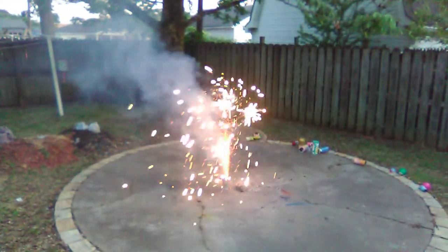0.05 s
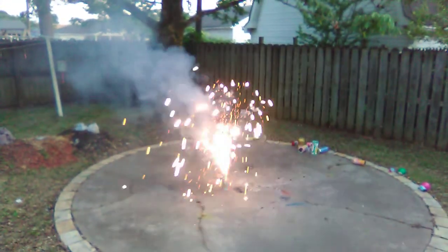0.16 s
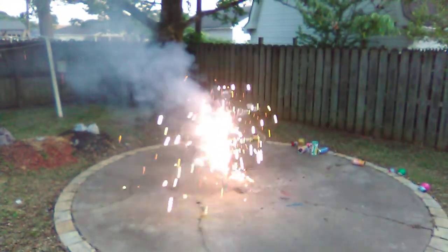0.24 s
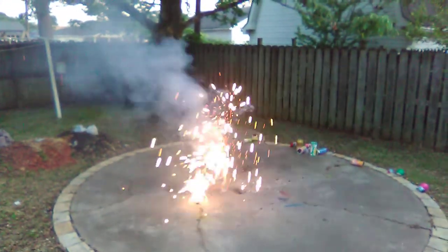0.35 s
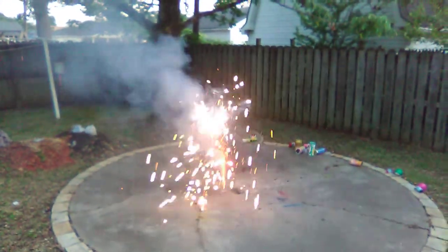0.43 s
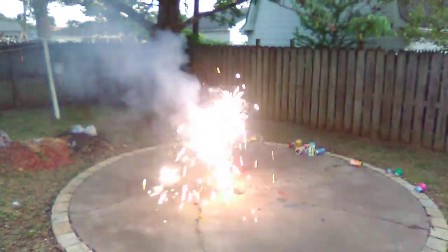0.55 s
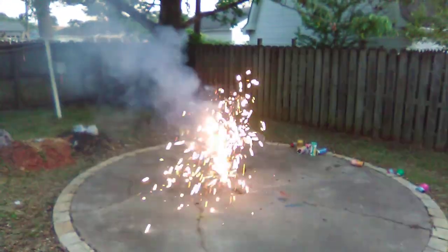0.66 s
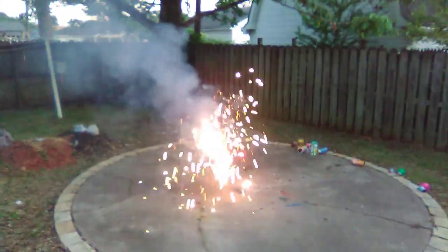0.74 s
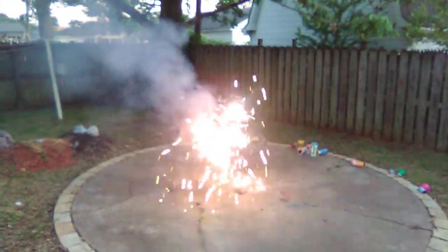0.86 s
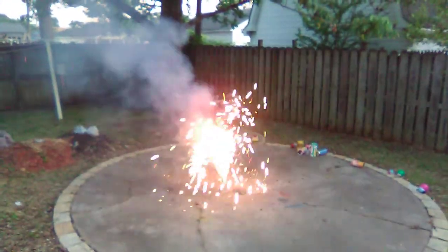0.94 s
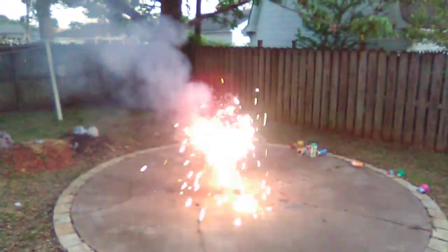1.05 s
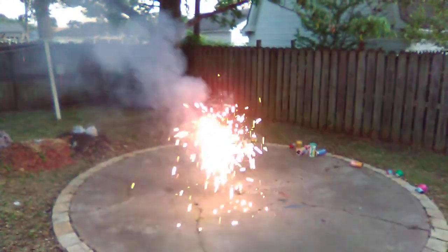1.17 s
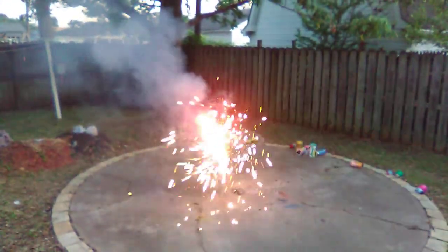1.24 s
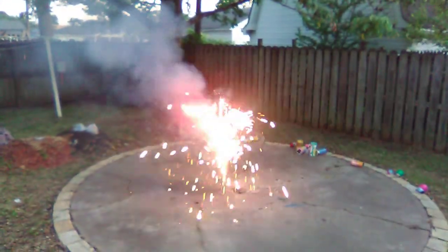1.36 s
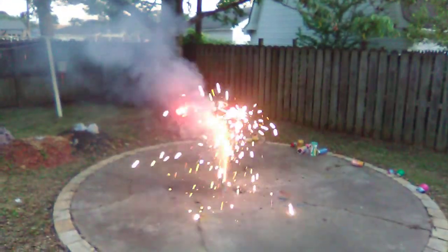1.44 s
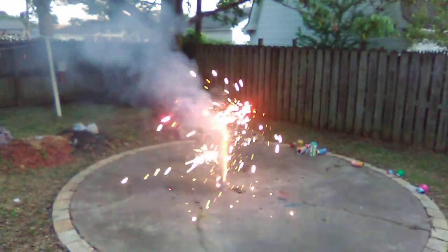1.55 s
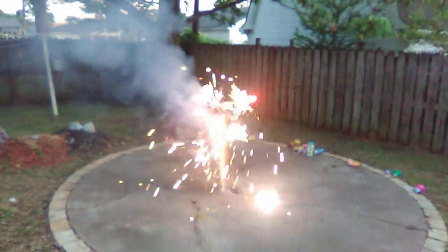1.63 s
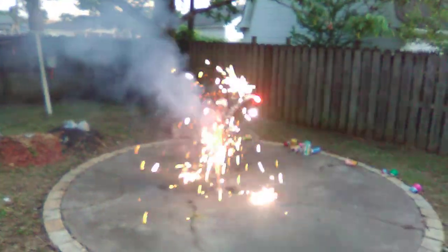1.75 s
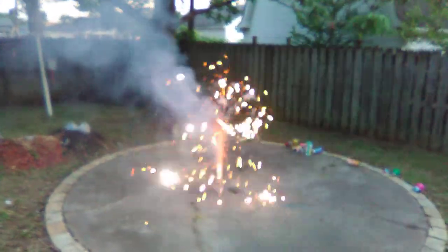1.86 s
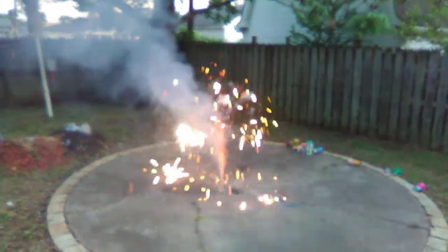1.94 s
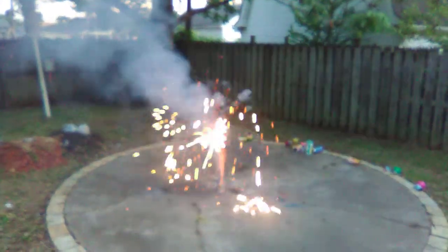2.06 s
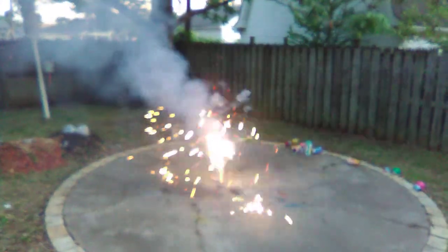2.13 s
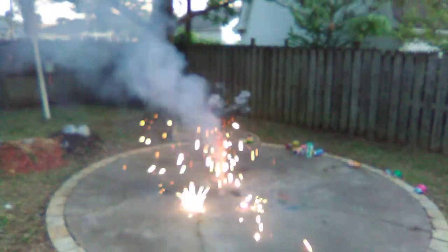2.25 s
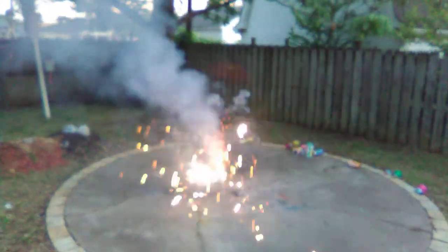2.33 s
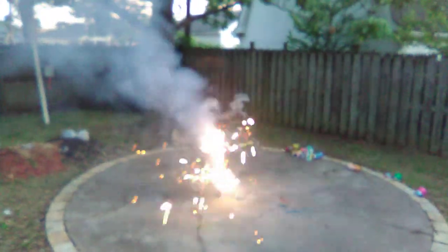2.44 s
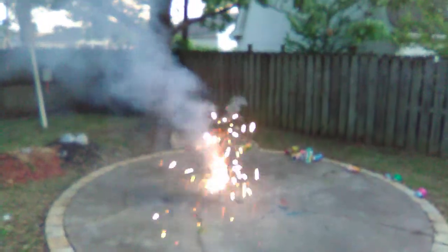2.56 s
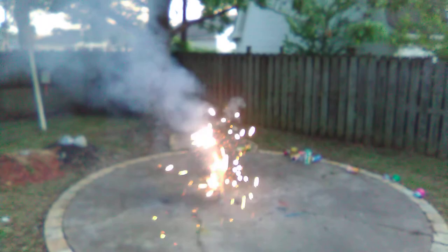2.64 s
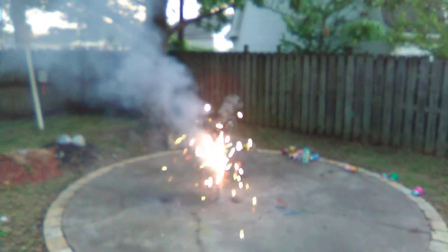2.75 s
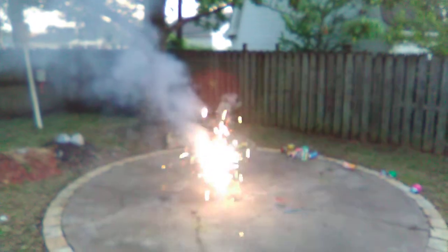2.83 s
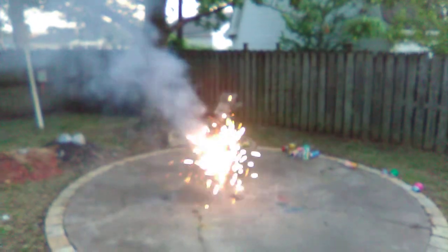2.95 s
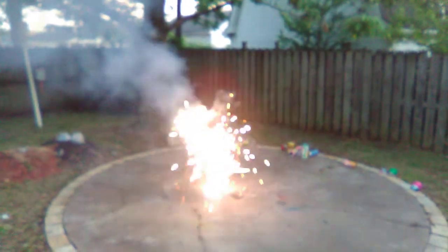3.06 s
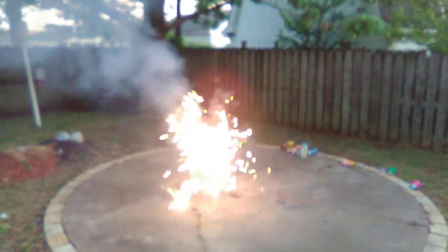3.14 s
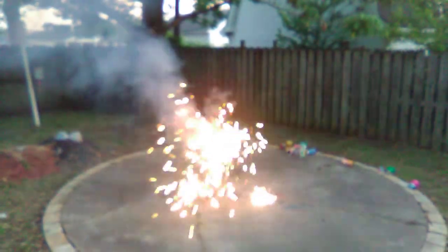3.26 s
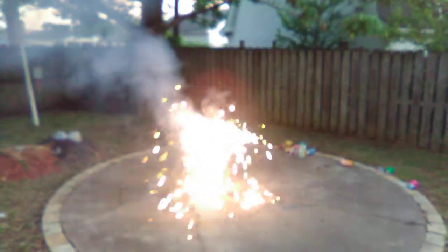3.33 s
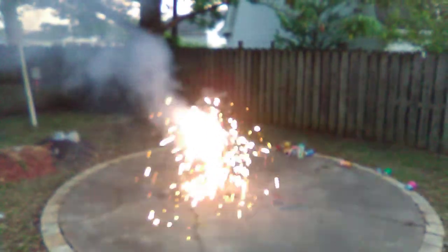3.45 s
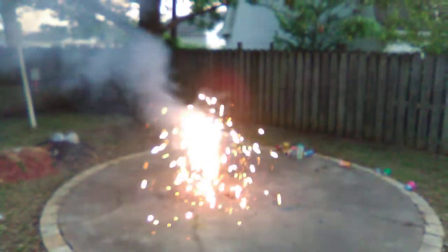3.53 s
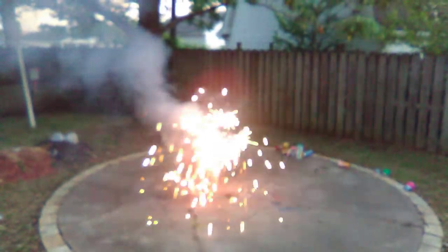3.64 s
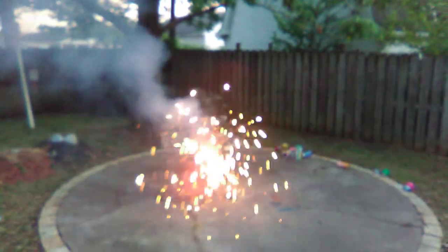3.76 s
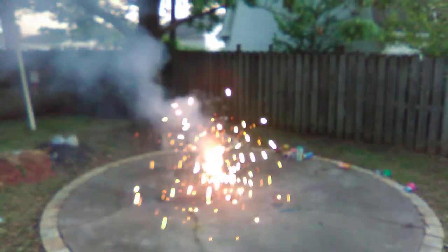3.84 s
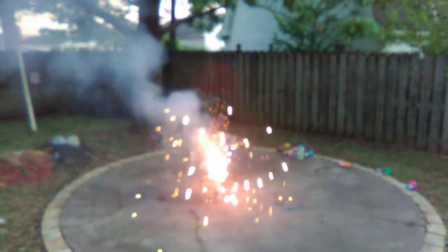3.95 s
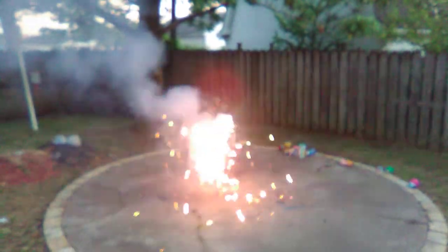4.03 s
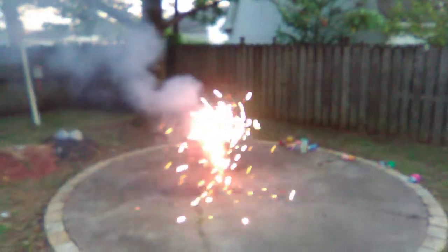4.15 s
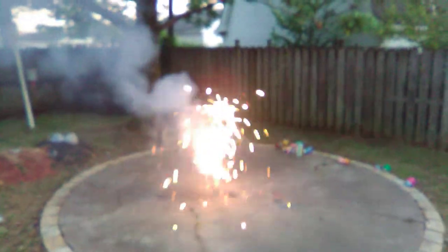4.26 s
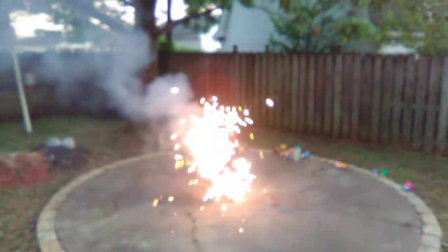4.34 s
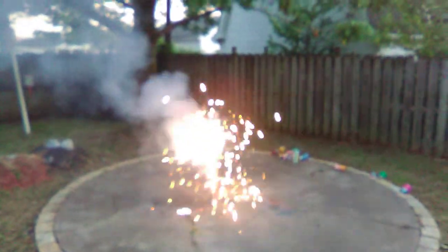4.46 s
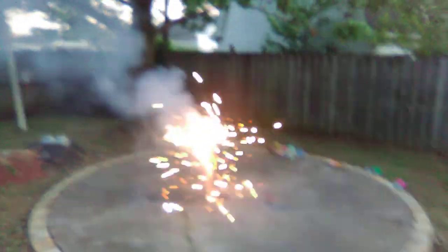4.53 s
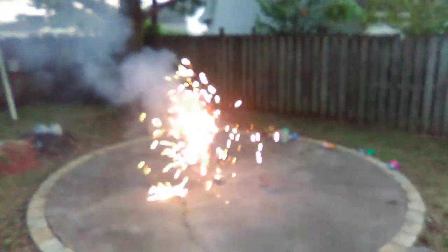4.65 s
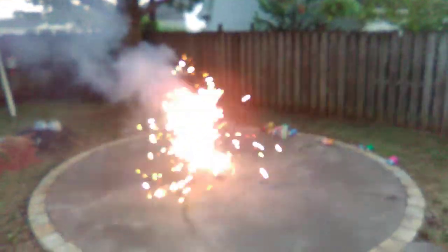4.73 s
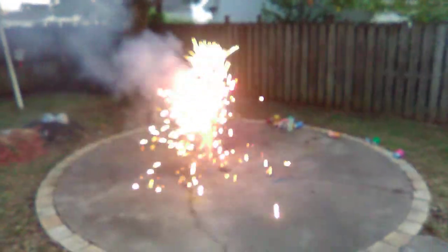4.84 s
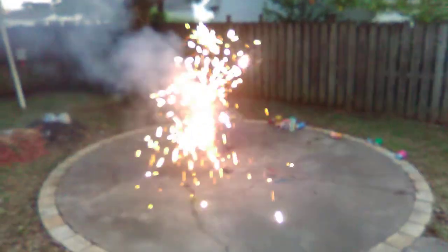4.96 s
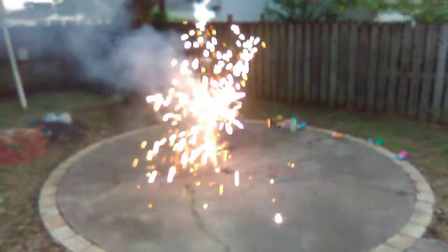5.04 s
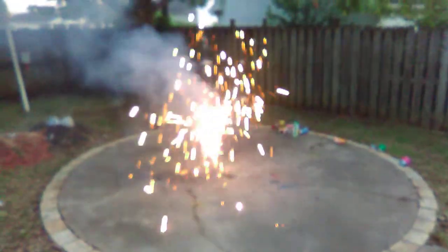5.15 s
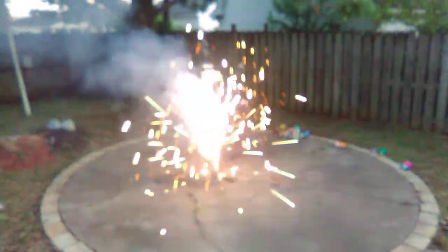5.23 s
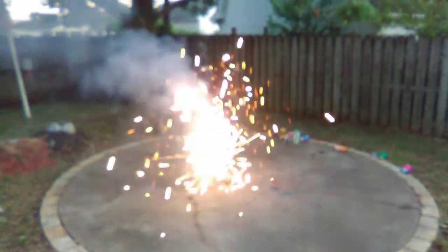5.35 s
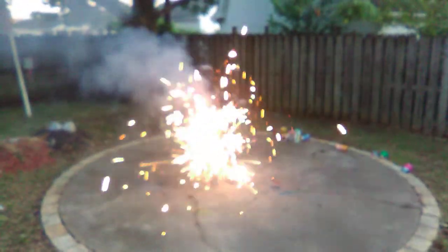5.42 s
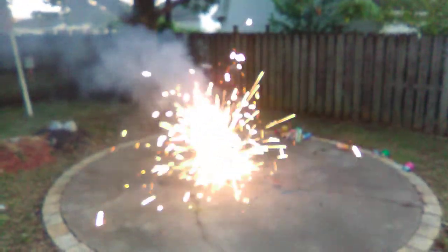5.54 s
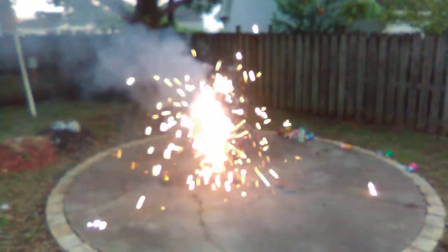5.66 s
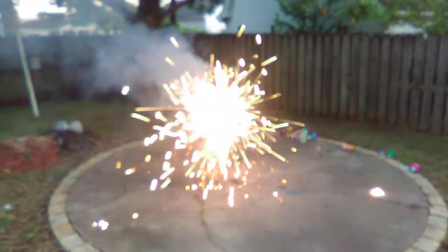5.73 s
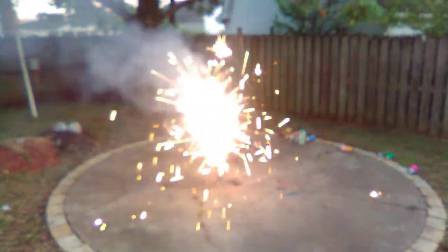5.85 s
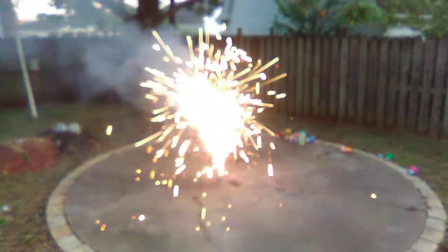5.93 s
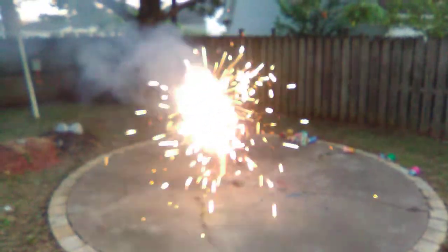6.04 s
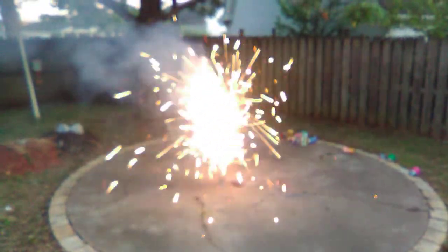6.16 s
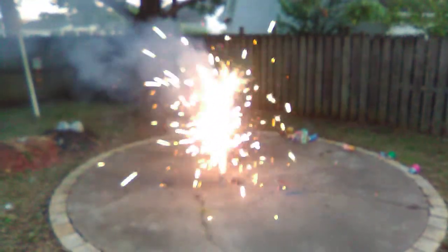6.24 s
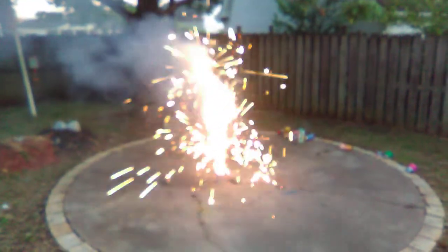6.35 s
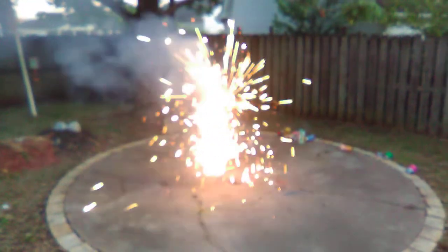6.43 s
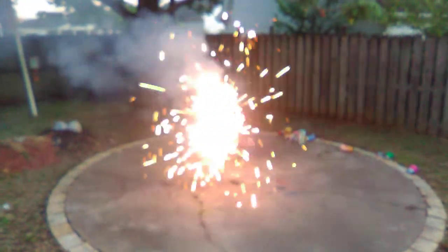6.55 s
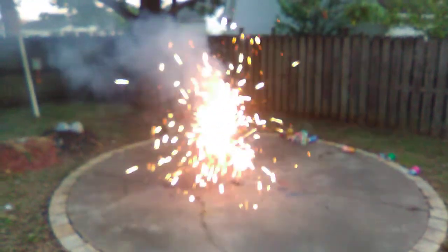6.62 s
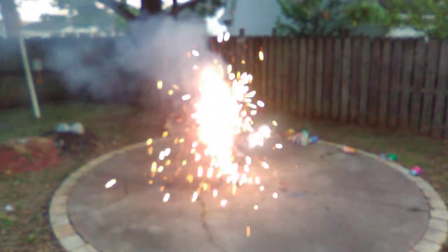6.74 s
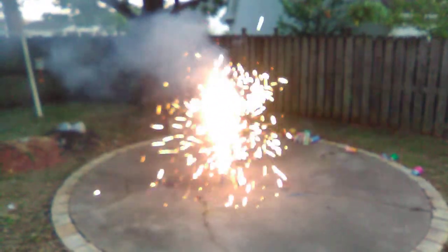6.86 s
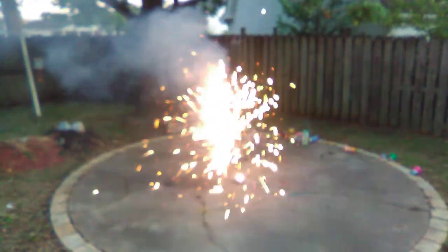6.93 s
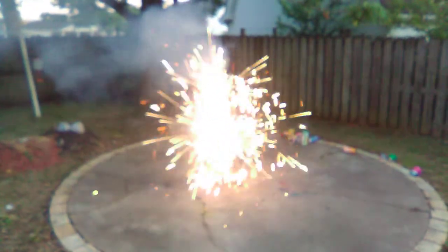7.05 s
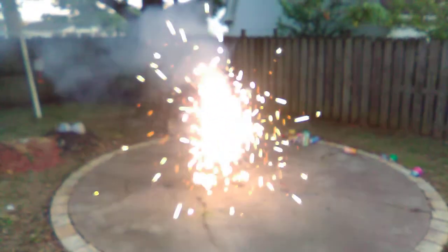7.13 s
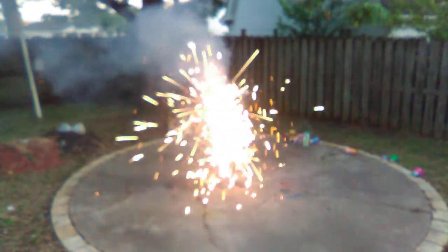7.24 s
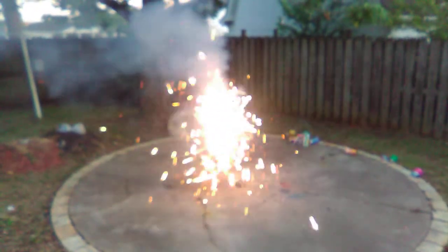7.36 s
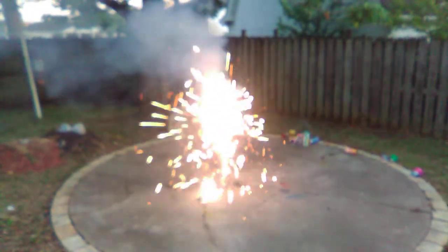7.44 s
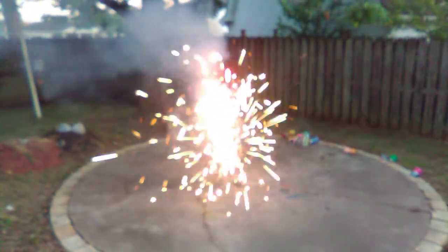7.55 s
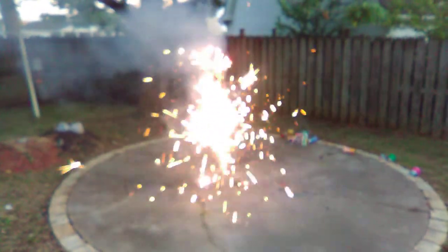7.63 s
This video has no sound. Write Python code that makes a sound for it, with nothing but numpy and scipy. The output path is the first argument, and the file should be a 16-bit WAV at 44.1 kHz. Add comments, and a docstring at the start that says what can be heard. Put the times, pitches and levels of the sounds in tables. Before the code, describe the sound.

A small fountain firework burns in a fenced backyard, hissing and sputtering quietly in uneven spurts with a few lone, dry pops. The hiss grows raspier and stronger, and after about five seconds the sparks burst into very loud, dense crackling. Volleys of sharp cracks ring briefly around the yard and overload the stereo microphones a few metres away with dull thumps.

```python
"""A hiss, sputtering in uneven spurts with a few lone pops: a small fountain firework burns on a concrete
patio in a fenced backyard, a few metres from a stereo pair of microphones. Its powder flares unevenly,
driving gas and bits of slag through the nozzle. After five seconds, crackling stars burst in dense
volleys that ring round the yard, drive the limiter hard and overload both microphones into dull thumps."""
import sys
import numpy as np
from scipy import signal
from scipy.fft import rfft, irfft, next_fast_len
from scipy.io import wavfile

SR = 44100
rng = np.random.default_rng(int(sys.argv[2]) if len(sys.argv) > 2 else 0)


def store_wav(level_fs):
    """Save 16-bit WAV to argv[1]."""
    pcm = np.round(np.clip(np.atleast_2d(level_fs), -1, 1) * 32767)
    wavfile.write(sys.argv[1], SR, pcm.T.astype(np.int16))


N = 339129
TIME = np.arange(N) / SR

# Tone colour of each sound at the microphones: frequency_hz, gain_db
AIR_SPECTRUM = [(25, -13), (90, 14), (200, -24), (600, -7), (2000, -17), (6000, -3), (14000, -36)]
HISS_SPECTRUM = [(800, -40), (2500, -26), (4200, -10), (6200, 4.5), (8500, 0.5), (11000, -2.5), (14000, 1)]
RASP_SPECTRUM = [(300, -22.5), (700, -13), (1300, -4), (2000, 2), (2700, 5.5), (3600, 1.5), (4600, -4.5),
                 (6000, -9.5), (10000, -42), (13000, -3.5)]
CHUFF_SPECTRUM = [(60, -32), (140, 6), (195, -6), (260, -1), (380, -4.5), (500, -3.5), (620, -6), (800, -9),
                  (1500, -10.5), (5000, -46)]
FLUTTER_SPECTRUM = [(25, -33), (55, -10), (75, -1), (90, 10), (115, -6), (160, -9), (250, -24), (800, -62)]
POP_SPECTRUM = [(100, -33), (700, -20), (1500, 2.5), (3000, -0.5), (4500, -3.5), (6500, -1), (9000, 1.5),
                (14000, -5)]
SNAP_SPECTRUM = [(30, -35), (150, -24), (500, -36), (1200, -16.5), (2200, -10), (3300, -17.5), (4800, -7.5),
                 (6800, -1), (10000, -2.5), (14000, -5.5)]
BODY_SPECTRUM = [(30, -6), (150, -12.5), (400, -5), (620, -5.5), (850, -0.5), (1400, -3), (2100, 1.5),
                 (3200, 0.5), (5000, 2.5), (8000, -5), (14000, -24)]
# Balance between the microphone ports: frequency_hz, left_minus_right_db
JET_TILT = [(100, -0.5), (450, 0.5), (1000, -3.5), (1900, -3), (3700, 2), (7000, 4.5), (11000, -11.5),
            (14000, -3.5)]
YARD_TILT = [(100, -2.5), (700, 1.5), (2000, 2.5), (4500, 2), (7000, 5), (10000, -3.5), (14000, -1)]
# Reflections: delay_s, gain_db
YARD_ECHOES = [(.004, -16), (.0095, -11.5), (0.0195, -15.5), (.025, -16)]  # off fence and house
PATIO_ECHO = [(.0006, -3)]  # straight back off the concrete
POP_ECHO = [(.0015, -5.5)]  # a lone pop flies higher, so its bounce is later and weaker

# Larger bits of slag spat through the nozzle: start_s, level_db, pitch_hz
LARGE_SLAG = [(0.025, -52, 1350), (0.315, -48, 1310), (0.375, -50.5, 1410), (0.514, -52, 854),
              (1.029, -51.5, 1870), (1.08, -45, 1520), (1.324, -49, 1920), (1.692, -51, 1120),
              (1.771, -52, 1280), (1.919, -55, 1380), (2.014, -53, 1295), (2.278, -50, 970),
              (2.38, -52, 1600), (2.501, -50.5, 1780), (2.605, -53, 1500), (2.824, -48, 1530),
              (2.866, -46.5, 2220), (2.915, -47.5, 1480), (3.058, -46.5, 1280), (3.147, -48.5, 875),
              (3.178, -47, 1153), (3.226, -42.5, 1760), (3.275, -47, 1360), (3.383, -49, 1140),
              (3.45, -47.5, 1310), (3.484, -49, 1500), (3.653, -44, 1600), (4.074, -47.5, 1290),
              (4.129, -41, 2320), (4.364, -41.5, 1600), (4.409, -47, 1330), (4.596, -42, 2280),
              (4.632, -46, 670), (4.868, -46, 2090)]
# Grains that flash on their own: start_s, snap_db, fizz_db
LONE_GRAINS = [(.322, -42, -48), (.484, -34, -50), (.598, -31, -48), (1.089, -31, -52), (1.1393, -24, -39),
               (1.4095, -24, -39), (1.832, -37, -54), (2.085, -39, -56), (2.2184, -30, -50),
               (2.2805, -37, -51), (2.3795, -32, -42), (2.425, -34, -52), (2.4803, -42, -49),
               (2.827, -35, -39), (2.8564, -22, -43), (3.0165, -37, -41), (3.5713, -27, -45),
               (3.6536, -35, -41), (3.7668, -29, -39), (4.131, -30, -45), (4.6009, -29, -37),
               (4.6683, -11.5, -36), (4.871, -25, -41), (5.0022, -10.5, -36), (5.0843, -6, -26),
               (5.1038, -17, -27)]
# The steady burn under the spurts: time_s, hiss_db, rasp_db, chuff_db
STEADY_BURN = [(0.0, -54.5, -60.0, -68), (0.5, -60, -53, -61), (0.95, -51, -54.0, -59.0),
               (1.5, -54.5, -57, -65.5), (2.2, -63, -63, -66), (2.8, -65, -64.5, -66.5),
               (3.3, -54, -57, -64.5), (3.92, -63.0, -62, -67.5), (4.15, -54.0, -45.5, -64),
               (4.8, -48.5, -49, -68), (5.2, -49, -46.5, -63)]
# The powder flares in spurts: start_s, length_s, hiss_db, rasp_db, chuff_db
POWDER_SPURTS = [(0.02, 0.042, -46, -49.0, -61), (0.18, 0.043, -45.5, -49, -58.0),
                 (0.318, 0.043, -36.5, -46, -48), (0.454, 0.076, -41, -43.5, -70.0),
                 (0.566, 0.045, -38.5, -48.5, -52.0), (0.62, 0.091, -44.0, -51.0, -70.0),
                 (1.014, 0.025, -45, -49.0, -50), (1.072, 0.029, -43, -50, -43.5),
                 (1.12, 0.032, -33.5, -46, -46.5), (1.312, 0.048, -53.0, -49.0, -57),
                 (1.369, 0.068, -40, -46, -61), (1.537, 0.039, -44, -51.5, -54),
                 (1.622, 0.068, -53, -51.0, -56.5), (1.674, 0.06, -54, -51, -54),
                 (1.752, 0.028, -53, -52.0, -62), (1.81, 0.023, -49, -52, -69),
                 (2, 0.02, -51, -55.0, -70.0), (2.266, 0.018, -70.0, -47.5, -73),
                 (2.37, 0.045, -42.5, -53, -70.0), (2.477, 0.028, -52, -55.0, -58),
                 (2.598, 0.12, -57.0, -52.5, -62.5), (2.835, 0.078, -36, -51, -54.0),
                 (2.908, 0.044, -38, -55, -70.0), (3.008, 0.081, -37, -48.5, -57.0),
                 (3.086, 0.12, -39, -46.5, -57.5), (3.211, 0.075, -34.5, -44.5, -56),
                 (3.317, 0.093, -37.5, -46.5, -55), (3.431, 0.061, -37.5, -47, -57),
                 (3.639, 0.043, -35.5, -49.0, -57), (3.762, 0.05, -34.5, -57.0, -47),
                 (3.822, 0.089, -47, -76, -76), (4.057, 0.015, -47, -40, -60.0),
                 (4.122, 0.033, -41.5, -41.5, -61), (4.197, 0.063, -56, -41, -50),
                 (4.332, 0.089, -51, -45.0, -66), (4.498, 0.04, -58.0, -43, -58),
                 (4.596, 0.12, -34, -38, -51.5), (4.709, 0.041, -30.5, -36.0, -43),
                 (4.764, 0.049, -36.5, -39.5, -59), (4.857, 0.025, -51, -41, -70.0),
                 (4.949, 0.11, -34, -43, -56.5), (5.074, 0.037, -24, -36.0, -49)]
# The flame billows with a low flutter: start_s, length_s, level_db
FLAME_BILLOWS = [(1.68, 0.032, -44.5), (2.825, .06, -41.5), (3.165, 0.037, -44), (3.375, 0.033, -50),
                 (4.645, 0.023, -45), (4.78, 0.14, -54), (4.96, 0.044, -49)]
# The jet leans with the breeze: time_s, left_minus_right_db
JET_LEAN = [(0, -0.5), (1.5, -1), (2.8, -2), (3.6, -1.5), (4.1, 5), (4.5, 6), (4.7, 6), (5.2, 4.5)]
# Crackle of fine sparks: time_s, ticks_per_s, level_db
SPARK_CRACKLE = [(0, 120, -63), (2.2, 64, -65), (3.2, 74, -54.5), (4.0, 120, -66), (4.7, 140, -55),
                 (5.33, 86, -51), (5.4, 570, -10), (5.9, 770, -13), (6.4, 600, -15.5), (6.7, 220, -39),
                 (7.1, 420, -19), (7.4, 450, -24), (7.69, 230, -40)]
# Stars and their pressure jolts: start_s, snap_db, body_offset_db, left_jolt_db, right_jolt_db
STAR_BURSTS = [(5.239, 2, 0.5, -15, 2.5), (5.3493, 4, -3, -14, -3), (5.399, 14, -1.5, -30, -30),
               (5.4639, 9, -1.5, -1, -2), (5.482, 1, 4.5, -12, -19), (5.5147, 13, 1, -4, -10),
               (5.542, -11, 2, -30, -1.5), (5.561, -8, 0, -4.5, -7), (5.573, 1, 3.5, -2, 1),
               (5.606, -6, 2, -5, -11), (5.626, 10, -1, -22, -3.5), (5.6576, 7.5, .5, -31, -1),
               (5.728, 8, 0.5, -26, 5), (5.757, 2, 4, -26, -6), (5.773, 23, 1.5, -8, -26),
               (5.873, 4, 0.5, -31, 0), (5.906, -9, -12, -31, -1), (5.9419, -3, 4, -5.5, -26),
               (5.968, -19, -4, -14, -1.5), (5.982, 31, 1.5, -8, -25.5), (6.0105, 3, -3, -7, 1),
               (6.045, 14, -3, -30, -9), (6.113, -3, 6, -30, 2), (6.135, -4, 7, -28, -9),
               (6.148, 15, 1, -14, 2.5), (6.1927, 4, -4, -23, 1), (6.2825, 4, -.5, -26, 2.5),
               (6.353, 1, 1.5, -32, 2.5), (6.392, -2, 1.5, -20, 3.5), (6.4216, 10.5, -1.5, -32, -0.5),
               (6.537, 3, 0, -24, -6.5), (6.589, 11, -5.5, -28, -30), (6.7363, -8, -4.5, -40, -40),
               (6.761, -16, -6, -40, -40), (6.8, 12.5, -0.5, -25, -2.5), (6.813, -14, 4, -30, -4),
               (6.832, -1.5, -3, -19, 2.5), (6.936, 5, -5, -10, -20), (7.0276, 3, -10, -40, 1),
               (7.071, 2, -25, -40, -4), (7.087, -12, -11, -35, 2), (7.0998, -5, 1, -31, -2.5),
               (7.1125, 7.5, -9, -33, -6), (7.191, 7, -8, -31, 3), (7.252, 12, -9.5, -30, -11),
               (7.304, -5, 1, -25, -2.5), (7.3093, 3.5, -4, -3, -10), (7.36, 2, -26, -38, -40),
               (7.423, -6.5, -20, -40, -40), (7.4344, 1, -23, -30, -4), (7.505, -10.5, -25, -40, -44),
               (7.533, 10, -14, -31, 0.5), (7.552, -3, -16, -23, 3), (7.5681, -10, -28, -23, 2.5),
               (7.58, -4, -26, -14, -4), (7.6, -3, -21, -30, -30), (7.626, 0, -11, -19, -6)]


def from_db(db):
    """Decibels to gain."""
    return np.exp(np.asarray(db) * (np.log(10) / 20))


def unit_rms(x):
    """Scale to an rms of 1."""
    return x / np.sqrt(np.mean(x ** 2) + 1e-20)


def in_time(rows):
    """Each column of a curve, at every sample."""
    time_s, *columns = np.transpose(rows)
    return [np.interp(TIME, time_s, column) for column in columns]


def at_hz(points, hz):
    """Read a spectrum on a log-frequency axis."""
    point_hz, db = np.transpose(points)
    return np.interp(np.log(hz + 1), np.log(point_hz), db)


def lag(x, seconds):
    """One-pole smoothing."""
    pole = np.exp(-1 / (seconds * SR))
    return signal.lfilter([1 - pole], [1, -pole], x + 1e-18)


def drift(turns_per_s):
    """A random wander with a spread of about 1."""
    points = rng.standard_normal(N // 8)
    return np.interp(TIME * turns_per_s, np.arange(len(points)), points) * np.sqrt(3 / 2)


def panned(x, db):
    """Make the left side louder than the right by db."""
    return x * from_db(db * np.array([[.5], [-.5]]))


def noise(spectrum, tilt, shared=0.15):
    """Coloured stereo noise of rms 1; the shared part of its power reaches both microphones in phase."""
    white = rng.standard_normal((3, N))
    stereo = np.sqrt(1 - shared) * white[:2] + np.sqrt(shared) * white[2]
    size = next_fast_len(N)
    hz = np.arange(size // 2 + 1) * SR / size
    gain = panned(from_db(at_hz(spectrum, hz)), at_hz(tilt, hz))
    return unit_rms(irfft(rfft(stereo, size) * gain, size)[:, :N])


def strikes(start_s, sizes):
    """A train of single-sample impulses."""
    return np.bincount(np.clip(np.round(start_s * SR).astype(int), 0, N - 1), sizes, N)


def dying(power, t60_s):
    """Each impulse of power starts an exponential decay; decays add up."""
    return signal.lfilter([1], [1, -from_db(-120 / (t60_s * SR))], power + 1e-18)


def bursts(start_s, level_db, t60_s):
    """Amplitude envelope of bursts that start at once and die away."""
    return np.sqrt(dying(strikes(start_s, from_db(level_db) ** 2), t60_s))


def flares(rows, t60_s, attack_s=.02):
    """Amplitude envelope of flares that each swell, hold and die away."""
    power = np.zeros(N)
    for start_s, length_s, db in rows:
        start = int(start_s * SR)
        t = TIME[:min(SR, N - start)]
        swell = np.minimum(t / attack_s, 1)
        decay = from_db(-60 * np.maximum(t - length_s, 0) / t60_s)
        power[start:start + len(t)] += (from_db(db) * swell * decay) ** 2
    return np.sqrt(power)


def released(db, db_per_s):
    """Follow rises at once and sink back at a steady rate."""
    return np.maximum.accumulate(db + db_per_s * TIME, axis=-1) - db_per_s * TIME


def echoed(x, echoes, dull_s=.00001):
    """Add reflections, dulled by rough surfaces and a little later at one microphone than the other."""
    out, dulled = x.copy(), lag(x, dull_s)
    for delay_s, db in echoes:
        delays = (delay_s * rng.uniform(0.87, 1.05, 2) * SR).astype(int)
        for side, delay in enumerate(delays):
            out[side, delay:] += from_db(db) * dulled[side, :N - delay]
    return out


def yard_air(level_db=-61):
    """The faint, steady air of the backyard."""
    return from_db(level_db) * noise(AIR_SPECTRUM, JET_TILT)


def small_slag(count=36, centre_hz=1450, spread_octaves=0.41):
    """Smaller bits of slag fly at random: rows of start_s, level_db, pitch_hz."""
    start_s = rng.uniform(0, TIME[-SR // 10], count)
    scatter_db, pitch = rng.standard_normal((count, 2)).T
    return list(zip(start_s, -55 + scatter_db, centre_hz * 2 ** (spread_octaves * pitch)))


def sputters(gain_db=3.0, swell_s=0.0043, width_hz=240.0, spit_db=-10.0):
    """Each bit of slag leaves the nozzle with a ragged spit and a short hollow puff at its own pitch."""
    bits = LARGE_SLAG + small_slag()
    puffs, t = np.zeros((2, N)), TIME[:SR // 10]
    envelope = t / swell_s * np.exp(1 - t / swell_s)
    radius = np.exp(-np.pi * width_hz / SR)
    for start_s, db, hz in bits:
        resonance = [1, -2 * radius * np.cos(2 * np.pi * hz / SR), radius ** 2]
        gas = rng.standard_normal((2, len(t))) + rng.standard_normal(len(t))
        puff = unit_rms(signal.lfilter([1, 0, -1], resonance, gas))
        start = int(start_s * SR)
        puffs[:, start:start + len(t)] += from_db(db + gain_db) * puff * envelope
    starts_s, levels_db, _ = np.transpose(bits)
    spits = bursts(starts_s, levels_db + gain_db + spit_db, t60_s=.04) * noise(POP_SPECTRUM, JET_TILT)
    return panned(puffs, db=-8.0) + spits


def pops():
    """A lone grain goes off above the patio with a dry snap and a short fizz."""
    start_s, snap_db, fizz_db = np.transpose(LONE_GRAINS)
    snap = bursts(start_s, snap_db, t60_s=.004) * noise(POP_SPECTRUM, JET_TILT, shared=0.62)
    fizz = bursts(start_s, fizz_db, t60_s=.16) * noise(POP_SPECTRUM, JET_TILT)
    return echoed(snap, POP_ECHO) + fizz


def eddies(gas, count=11, depth_db=3.5):
    """Eddies of different sizes come and go, each swelling and thinning its own narrow band."""
    edges_hz = np.geomspace(80, 14000, count + 1)
    out = np.zeros_like(gas)
    for k in range(count):
        band = signal.butter(2, edges_hz[k:k + 2], "band", fs=SR, output="sos")
        out += (-1) ** k * signal.sosfilt(band, gas) * from_db(depth_db * drift(45))
    return out


def jet(rasp_db=-1.5, chuff_db=-3.0, flutter_follow_db=-8.5, flicker_db=1.97, grain_db=0.5):
    """Spark hiss, nozzle rasp and gas chuff flicker together as the powder burns; the flame flutters."""
    start_s, length_s, *spurts_db = np.transpose(POWDER_SPURTS)
    t60s_s = (0.21, 0.19, 0.098)  # after a spurt the hiss dies last, the chuff first
    hiss, rasp, chuff = [np.hypot(from_db(burn_db), flares(zip(start_s, length_s, db), t60_s))
                         for burn_db, db, t60_s in zip(in_time(STEADY_BURN), spurts_db, t60s_s)]
    billow = np.hypot(flares(FLAME_BILLOWS, t60_s=.13), from_db(flutter_follow_db) * chuff)
    flicker = from_db(flicker_db * drift(110) + grain_db * drift(1400))
    fizz = hiss * noise(HISS_SPECTRUM, JET_TILT)
    gas = from_db(rasp_db) * rasp * noise(RASP_SPECTRUM, JET_TILT)
    gas += from_db(chuff_db) * chuff * noise(CHUFF_SPECTRUM, JET_TILT, shared=0.81)
    flutter = billow * noise(FLUTTER_SPECTRUM, JET_TILT, shared=0.96)
    return flicker * (fizz + eddies(gas)) + flutter


def sparks(spread_db=10.0):
    """Countless small grains tick at random, a few much louder than the rest."""
    ticks_per_s, level_db = in_time(SPARK_CRACKLE)
    sizes = from_db(spread_db * np.minimum(rng.exponential(1, N), 3))
    fired = rng.random(N) < ticks_per_s / SR
    power = dying(fired * sizes ** 2 / ticks_per_s, t60_s=0.003)
    envelope = from_db(level_db) * unit_rms(np.sqrt(power))
    return echoed(envelope * noise(SNAP_SPECTRUM, YARD_TILT, shared=0.12), PATIO_ECHO)


def stars(direct_db=16.0, far_db=-22.5, body_trim_db=-3.5, grain_db=0.5, gain_db=-2.0):
    """A star bursts with a sharp snap; the fence slats and trees scatter it into a grainy tail."""
    start_s, snap_db, body_offset_db, _, _ = np.transpose(STAR_BURSTS)
    body_db = snap_db + body_offset_db + body_trim_db
    out = np.zeros((2, N))
    for spectrum, db in ((SNAP_SPECTRUM, snap_db), (BODY_SPECTRUM, body_db)):
        direct = bursts(start_s, db + direct_db, t60_s=0.0012) * noise(spectrum, YARD_TILT, shared=0.23)
        out += echoed(direct, PATIO_ECHO)
        near_tail = bursts(start_s, db, t60_s=0.21)
        far_tail = bursts(start_s, db + far_db, t60_s=0.8)
        grain = from_db(grain_db * drift(900))
        out += np.hypot(near_tail, far_tail) * grain * noise(spectrum, YARD_TILT, shared=0.048)
    return out * from_db(gain_db)


def scene():
    """The firework from a few metres away, with its echoes off fence and house, over the yard's air."""
    lean_db, = in_time(JET_LEAN)
    nozzle = panned(jet(), lean_db) + sputters()
    firework = echoed(nozzle + stars() + sparks(), YARD_ECHOES, dull_s=.00007)
    return firework + pops() + yard_air()


def limiter(x, threshold_db=-6.0, sense_s=0.0042, release_db_per_s=462.0):
    """Each channel is turned down above the threshold, so loud tails stay flat before they fall."""
    level_db = 10 * np.log10(lag(x ** 2, sense_s) + 1e-12)
    excess_db = np.maximum(level_db - threshold_db, 0)
    return x * from_db(-released(excess_db, release_db_per_s))


def choke(starts_s, jolts_db, full_jolt_dip_db=8.5, hold_s=0.0088, recover_db_per_s=1300.0):
    """Gain of a microphone jolted off its bias: it dips briefly, deeper for a harder jolt."""
    dip_db = np.zeros(N)
    for start_s, db in zip(starts_s, jolts_db):
        held = slice(int(start_s * SR), int((start_s + hold_s) * SR))
        dip_db[held] = np.maximum(dip_db[held], full_jolt_dip_db * from_db(db))
    return from_db(-lag(released(dip_db, recover_db_per_s), seconds=0.00033))


def overload(x, coupling_hz=61.0, fast_s=0.000098, slow_s=0.00035, thump_db=-2.0, lopsided=0.045):
    """Close blasts choke the microphones and shift their bias; the bass filters swing back in a thump."""
    start_s, _, _, *jolts_db = np.transpose(STAR_BURSTS)
    toss, sharpness = rng.random((len(start_s), 2)).T  # some jolts click, others are round
    jolts = np.sign(toss - .5) * from_db(np.array(jolts_db) + thump_db)
    choked = x * np.array([choke(start_s, db) for db in jolts_db])
    sharp_steps = np.cumsum([strikes(start_s, side * sharpness) for side in jolts], axis=1)
    round_steps = np.cumsum([strikes(start_s, side * (1 - sharpness)) for side in jolts], axis=1)
    rumble = lopsided * choked ** 2  # a hard-driven diaphragm yields more one way
    bias = lag(lag(sharp_steps, fast_s) + lag(round_steps, slow_s) + rumble, fast_s)
    bass_filter = signal.butter(4, coupling_hz, "high", fs=SR, output="sos")
    return choked + signal.sosfilt(bass_filter, bias)


def record(dry, clip_level=0.86, cutoff_hz=14250):
    """Limiter, microphone overload, softly flattened peaks and a steep cut of the top treble."""
    driven = overload(limiter(dry)) / clip_level
    clipped = clip_level * driven / (1 + driven ** 6) ** (1 / 6)
    treble_cut = signal.ellip(12, .1, 70, cutoff_hz, fs=SR, output="sos")
    return signal.sosfilt(treble_cut, clipped)


dry = scene()
out = record(dry)
store_wav(out)
```